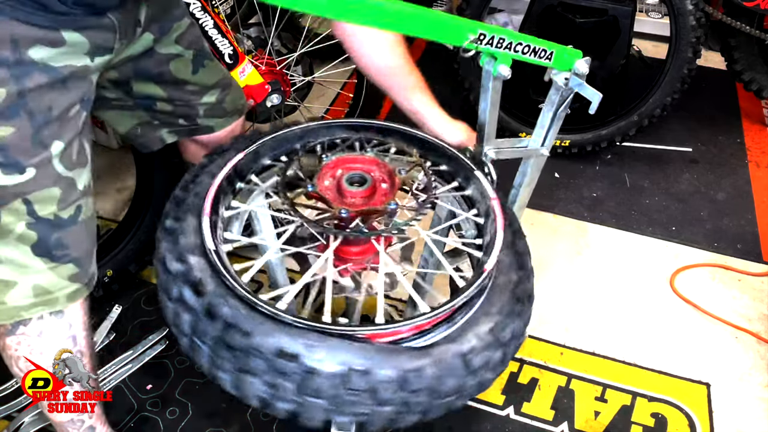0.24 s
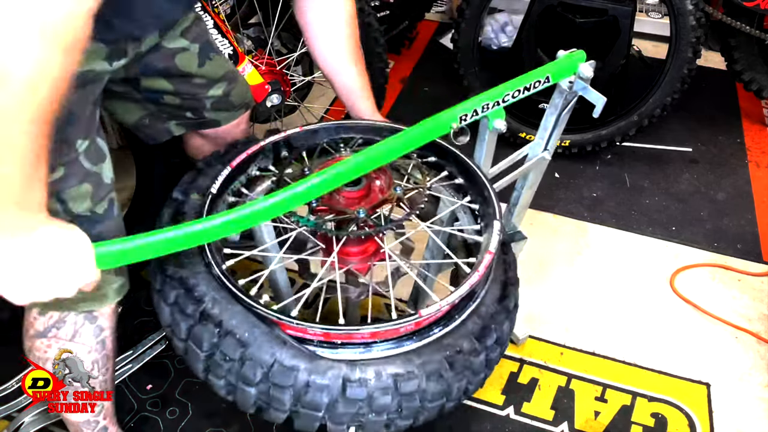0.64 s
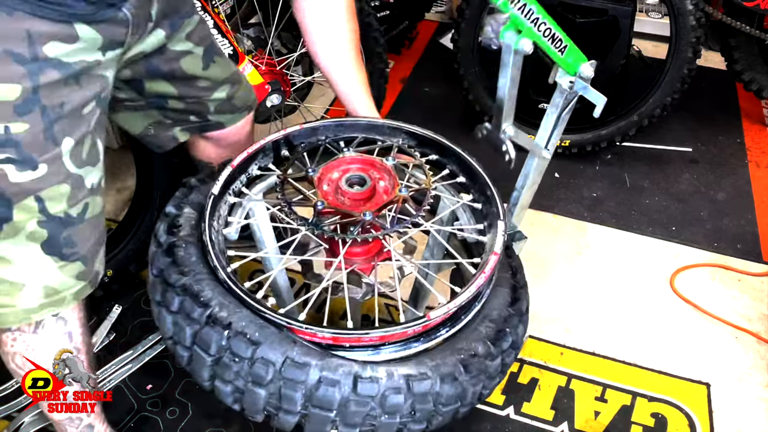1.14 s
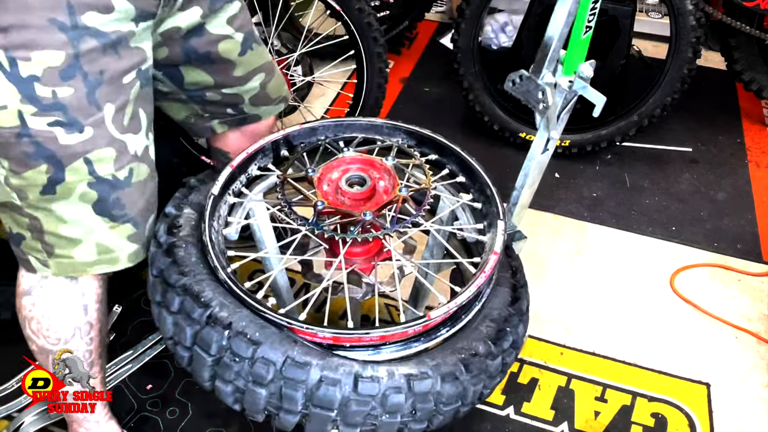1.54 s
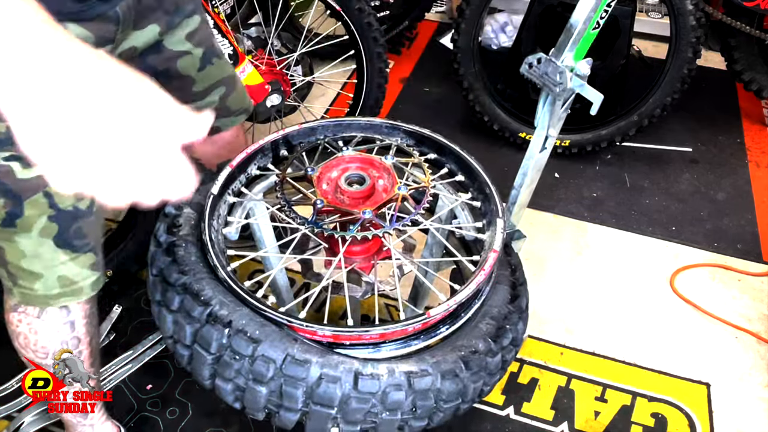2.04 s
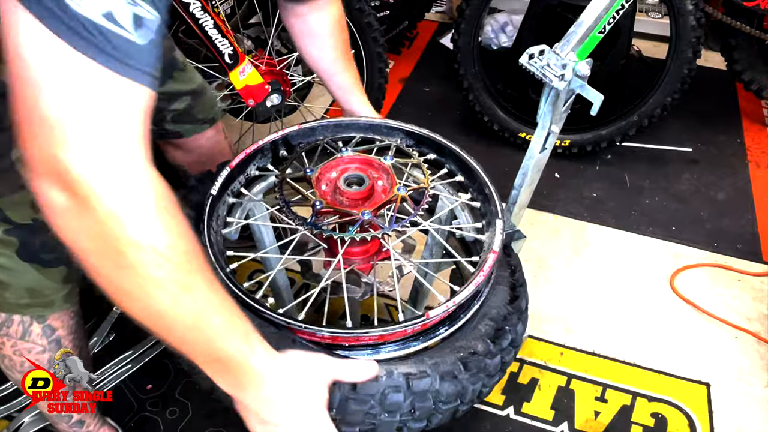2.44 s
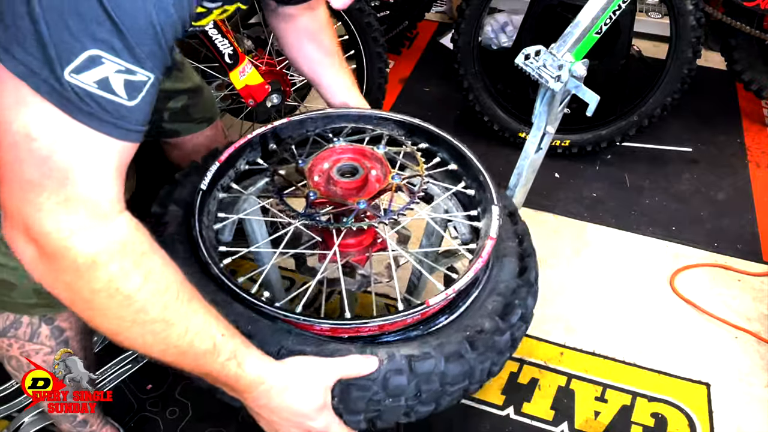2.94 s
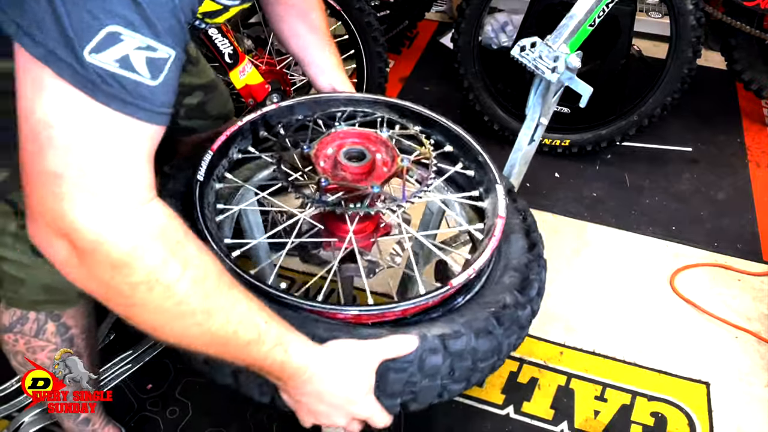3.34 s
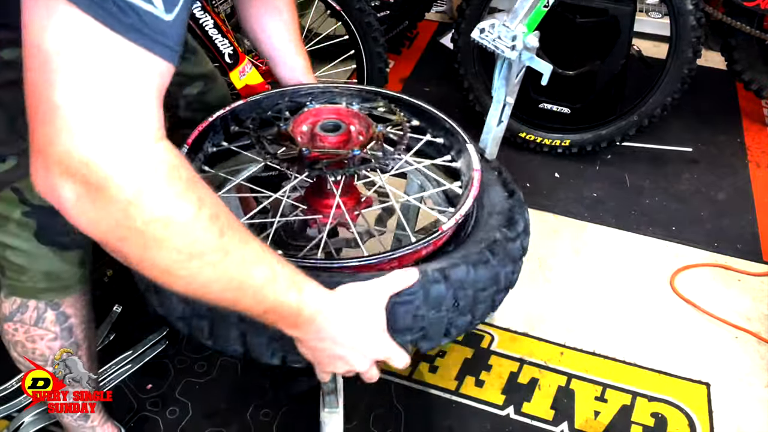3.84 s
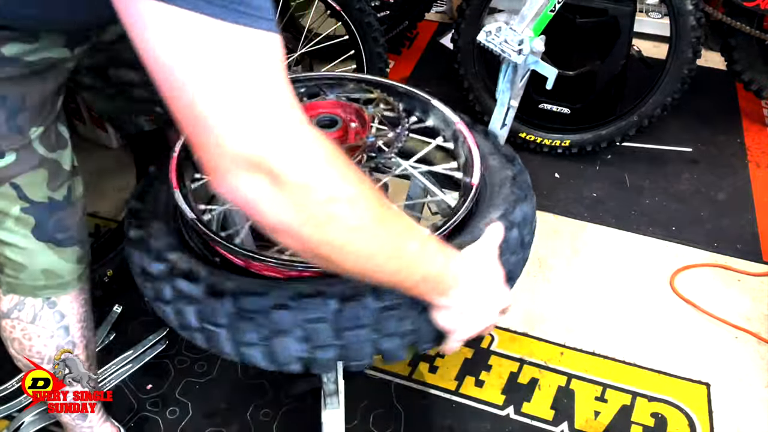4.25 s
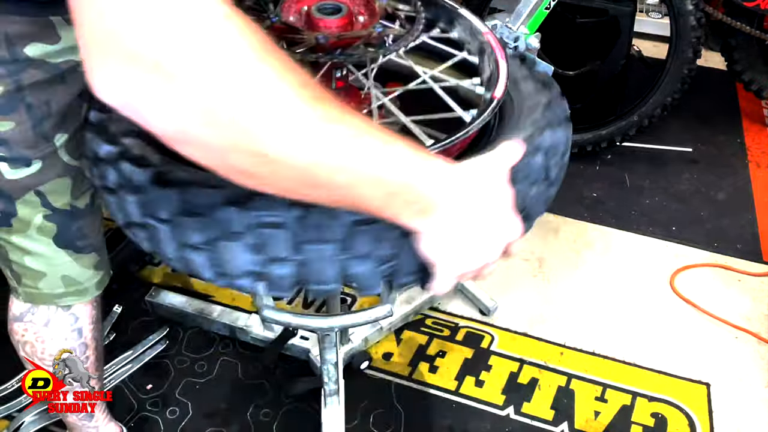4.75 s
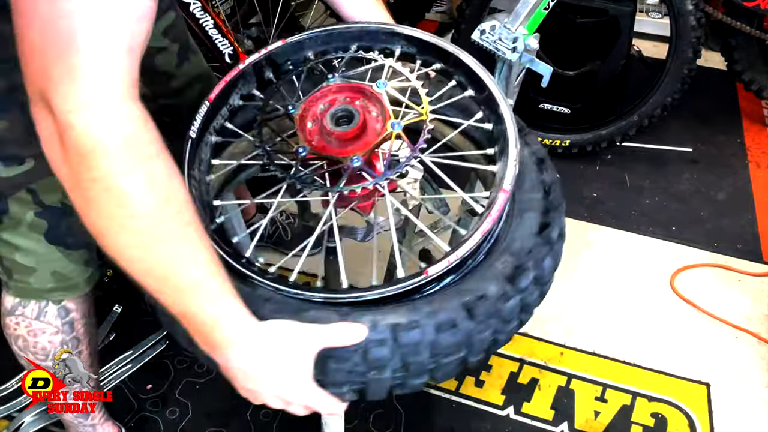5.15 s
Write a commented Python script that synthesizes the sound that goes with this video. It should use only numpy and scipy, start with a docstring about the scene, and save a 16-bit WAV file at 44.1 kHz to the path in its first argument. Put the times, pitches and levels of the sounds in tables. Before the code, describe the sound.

Close stereo pickup in a hard-walled garage: a lever and linkage clack in quick ringing blows over rubber thumps, pops and coarse scraping. The work fades to small taps while a faint low hum swells and goes. Soft touches follow, then the tire is tugged on its stand with harder knocks, rattles and ticks, the loudest clank near the end.

```python
"""A knobby tire is levered and pulled off a spoked wheel on a steel stand in a garage, in about 5.4 s.
First the lever and its linkage clack in quick blows, ringing lever modes, over rubber thumps, pops and scrapes.
A low sine hum swells to its peak near 1.5 s and is gone by 2.1 s, while the scrape all but stops.
Then blows ring the wheel: light taps, harder knocks on the stand from 3.5 s, the hardest near 5.1 s.
Rattles and bright ticks dot the work; noise tails are the hard walls' answer; a close pair of microphones hears it."""
import sys
import numpy as np
from scipy import signal
from scipy.fft import rfft, irfft, next_fast_len
from scipy.io import wavfile

SR = 44100
rng = np.random.default_rng(int(sys.argv[2]) if len(sys.argv) > 2 else 0)


def persist_wave(psi):
    """Save psi, clipped to +-1, as 16-bit WAV."""
    counts = np.round(np.clip(psi, -1, 1) * 32767).astype(np.int16)
    wavfile.write(sys.argv[1], SR, np.atleast_2d(counts).T)


N = 238316
PAD = next_fast_len(N + SR)   # room for a one-second tail
HZ = np.maximum(np.fft.rfftfreq(PAD, 1 / SR), 1)


def from_db(db):
    """Decibels to amplitude."""
    return 10 ** (np.asarray(db) / 20)


def rms_one(x):
    """Scale to an rms of one."""
    return x / np.sqrt(np.mean(x ** 2) + 1e-20)


def peak_one(x):
    """Scale to a peak of one, channels together."""
    return x / np.max(np.abs(x))


def at_hz(points, hz=HZ):
    """Read a curve of (frequency, value) points, straight over log frequency."""
    point_hz, value = np.transpose(points)
    return np.interp(np.log(hz), np.log(point_hz), value)


def shaped(x, response):
    """Filter by a frequency response."""
    return irfft(rfft(x, PAD) * response, PAD)[..., :N]


def band(x, low_hz, high_hz):
    """Keep one band, with gentle slopes."""
    return signal.sosfilt(signal.butter(2, [low_hz, high_hz], "band", fs=SR, output="sos"), x)


def ring(x, hz, t60_s):
    """A damped resonator: a unit click sets a sine of height about one ringing."""
    radius = from_db(-60 / (t60_s * SR))
    angle = 2 * np.pi * hz / SR
    feedback = [1, -2 * radius * np.cos(angle), radius * radius]
    return signal.lfilter([0, np.sin(angle)], feedback, x + 1e-18)


def chatter(contact_ms, bite_ms=1.0, size=4096):
    """Contact noise that bites quickly, rattles for its length and lets go."""
    t_ms = np.arange(size) / SR * 1000
    bite = (1 - np.exp(-t_ms / bite_ms)) ** 2
    let_go = np.exp(-(t_ms / contact_ms) ** 0.64)
    return rng.standard_normal(size) * bite * let_go


def add(out, start_s, sound):
    """Mix a sound in at its start, cut at the end of the scene."""
    i = round(start_s * SR)
    out[..., i:i + sound.shape[-1]] += sound[..., :out.shape[-1] - i]


# decay of the garage's reflections: centre_hz, t60_s
GARAGE_DECAY = [(100, 0.68), (260, 0.16), (700, 0.69), (1840, 0.53), (4850, 0.61), (9000, 0.3),
                (13000, 0.17)]
GARAGE_DB = -4.5


def garage(x):
    """Dense reflections: noise dying band by band, different in each channel, building up after the first wall."""
    t = np.arange(SR) / SR
    edges_hz = np.geomspace(40, 18000, 14)
    white = rng.standard_normal((2, 2, SR))   # neighbouring bands take turns with two noises
    tail = np.zeros((2, SR))
    for k, (low, high) in enumerate(zip(edges_hz, edges_hz[1:])):
        t60_s = at_hz(GARAGE_DECAY, np.sqrt(low * high))
        tail += band(white[k % 2], low, high) * from_db(-60 * t / t60_s)
    tail *= np.clip((t - 0.004) / 0.0041, 0, 1)
    tail /= np.sqrt(np.sum(tail ** 2) / 2)
    return shaped(x, rfft(tail, PAD))


# colour of the stand and floor shake: freq_hz, density_db (per Hz, relative)
SHAKE_SPECTRUM = [(13, -39.5), (22, -13.5), (81, 7), (136, -12.5), (205, -2), (278, -13.5), (400, -26),
                  (520, -69.5), (880, -120)]
SHAKE_DB, SHAKE_FOLLOWS = -33.5, 0.43   # base level; dB of shake per dB of effort


def stand_shake():
    """Lumpy low noise from the stand and floor, following part of the effort's swing."""
    noise = shaped(rng.standard_normal(N), from_db(at_hz(SHAKE_SPECTRUM)))
    return from_db(SHAKE_DB + SHAKE_FOLLOWS * effort_db()) * rms_one(noise)


HUM_PEAK_S, HUM_END_S = 1.53, 2.1
HUM_DB, HUM_RISE_DB_PER_S, HUM_FALL_DB_PER_S = -46.5, 26.5, 28.5   # rms level at the peak, and slopes
HUM_HZ, HUM_SAG_HZ_PER_S = 56.3, 3   # pitch at the peak, and its fall


def hum():
    """A low sine that swells and fades while its pitch sags a little."""
    t = np.arange(N) / SR - HUM_PEAK_S
    level_db = HUM_DB + np.minimum(HUM_RISE_DB_PER_S * t, -HUM_FALL_DB_PER_S * t)
    fade = np.clip((HUM_END_S - HUM_PEAK_S - t) / 0.088, 0, 1)
    hz = HUM_HZ - HUM_SAG_HZ_PER_S * t
    return np.sqrt(2) * fade * from_db(level_db) * np.sin(2 * np.pi * np.cumsum(hz) / SR)


# effort on the tire, as the drive of rubber dragged on rim and stand: time_s, level_db
EFFORT = [(0.0, -35.5), (0.15, -33), (0.3, -49.5), (0.43, -41), (0.62, -28.5), (0.86, -35), (1.05, -44.5),
          (1.35, -52.5), (1.64, -54), (1.86, -81.5), (2.2, -83.5), (2.28, -53), (2.45, -53), (2.58, -56),
          (2.7, -51.5), (2.85, -55.5), (2.99, -60.5), (3.1, -57), (3.34, -44), (3.76, -38), (3.94, -45.5),
          (4.18, -49), (4.3, -45), (4.66, -38.5), (4.83, -65), (5.11, -43.5), (5.26, -32.5), (5.4, -59)]


def effort_db():
    """The effort drawn straight from point to point."""
    time_s, level_db = np.transpose(EFFORT)
    return np.interp(np.arange(N) / SR, time_s, level_db)


# colour of dragged rubber: freq_hz, density_db (per Hz, relative)
RUBBER_SPECTRUM = [(100, -31.5), (160, 1.5), (500, 0.5), (1000, 2), (2200, -3.5), (3500, -9), (6000, -16),
                   (9000, -21), (12000, -28.5), (16000, -36.5)]
SLIPS_PER_S = 1500   # nominal: the clumps thicken and thin it
TILT_DB = 0.47   # added per band, dull to bright


def scrape():
    """Stick-slip: random slips of uneven size, in clumps, through the colour of the rubber."""
    clumps = from_db(6 * rms_one(band(rng.standard_normal(N), 7, 40)))
    sizes = from_db(1.4 * np.minimum(rng.exponential(1, (2, N)), 5)) * rng.choice([-1, 1], (2, N))
    happens = rng.random((2, N)) < SLIPS_PER_S * clumps / SR
    slips = sizes * happens / np.sqrt(SLIPS_PER_S / SR)
    hiss = 0.27 * rng.standard_normal((2, N))
    rubbed = rms_one(shaped(slips + hiss, from_db(at_hz(RUBBER_SPECTRUM))))
    edges_hz = [100, 600, 1500, 3500, 7500, 17000]
    tilted = np.zeros((2, N))
    for k, (low, high) in enumerate(zip(edges_hz, edges_hz[1:])):
        tilted += from_db(TILT_DB * k) * band(rubbed, low, high)
    return from_db(effort_db()) * tilted


# dull thumps of rubber and feet: start_s, level_db, nominal_hz, t60_ms (10 at least)
THUMP_EVENTS = [(0.022, -42.5, 410, 34), (0.139, -41.5, 303, 33), (0.27, -42, 339, 100),
                (0.324, -40.5, 346, 26), (0.467, -29, 356, 67), (0.488, -31.5, 622, 37),
                (0.594, -35, 388, 34), (0.625, -25.5, 302.4, 22), (0.703, -37, 347, 25),
                (1.025, -43, 206, 75), (1.582, -42, 66, 31), (1.701, -62.5, 394, 61),
                (1.862, -41.5, 197.6, 68), (2.287, -54.5, 516, 13), (2.303, -52, 195, 42),
                (2.39, -54.5, 200, 69), (2.627, -45, 130, 72), (2.767, -38.5, 108.5, 65),
                (3.114, -46, 208, 81), (3.392, -38, 82, 56), (3.521, -43, 457, 48), (3.617, -40.5, 228, 26),
                (3.714, -23, 112.7, 47), (4.136, -43, 256, 150), (4.592, -33.5, 253, 21),
                (4.746, -39, 233, 22), (5.064, -23.5, 298, 8.4), (5.083, -40, 111, 63),
                (5.211, -40, 212, 20)]
BOOM_DB = -5.5


def thumps():
    """A soft push into one low damped mode, sagging in pitch as the rubber relaxes, and a boom from the floor."""
    out, t = np.zeros(N), np.arange(8192) / SR
    for start_s, level_db, nominal_hz, t60_ms in THUMP_EVENTS:
        push = chatter(13.0, 1.1, size=8192)
        sagging_hz = nominal_hz * (0.89 + 0.34 * np.exp(-t / 0.013))
        phase = 2 * np.pi * (np.cumsum(sagging_hz) / SR + rng.random())
        swell = (1 - np.exp(-t / 0.0082)) ** 4
        decay = from_db(-60000 * t / max(t60_ms, 10))
        note = peak_one(np.sin(phase) * swell * decay)
        slap = 1.2 * peak_one(band(push, nominal_hz / 6.6, nominal_hz * 3.1))
        boom = from_db(BOOM_DB) * peak_one(band(push, 63, 160))
        add(out, start_s, from_db(level_db) * (note + slap + boom))
    return out


# short round pops of rubber letting go: peak_s, level_db, pitch_hz (at the peak), width_ms (peak to 1/e)
POP_EVENTS = [(0.035, -27.5, 420, 3.1), (0.479, -29, 384, 1.5), (0.604, -21, 393, 3.1),
              (0.636, -23, 390, 2.8), (0.715, -23.5, 370, 3.1), (0.76, -33, 617, 4.9),
              (2.616, -40, 371, 1.8), (2.74, -37, 400, 1), (2.763, -38.5, 410, 2.7), (3.127, -41, 230, 4.4),
              (3.629, -38, 302, 2.6), (4.341, -35.5, 370, 2.6), (4.757, -43, 261, 4.1)]


def pops():
    """A brief tone under a bell-shaped swell, sliding down in pitch."""
    out, t = np.zeros(N), np.arange(-512, 1024) / SR
    for peak_s, level_db, pitch_hz, width_ms in POP_EVENTS:
        swell = np.exp(-(1000 * t / width_ms) ** 2)
        cycles = pitch_hz * t * (1 - 15 * t) + rng.random()
        add(out, peak_s + t[0], from_db(level_db) * swell * np.cos(2 * np.pi * cycles))
    return out


# thin bright ticks: start_s, level_db, contact_ms
TICK_EVENTS = [(0.2455, -30.5, 4), (0.474, -29, 14), (0.8286, -34.5, 7.9), (1.3608, -25.5, 1.5),
               (1.72, -41.5, 8.9), (2.38, -42.5, 6.8), (2.828, -41, 10.5), (3.212, -48, 16),
               (3.644, -26.5, 5.1), (3.8625, -23, 14), (3.898, -23, 13), (4.4629, -24, 10)]
TICK_HZ = 7080


def ticks():
    """Small hard touches: treble contact noise and a faint high resonance."""
    out = np.zeros(N)
    for start_s, level_db, contact_ms in TICK_EVENTS:
        contact = chatter(contact_ms)
        touch = peak_one(band(contact, 5700, 16000))
        ping = 0.2 * peak_one(ring(contact, TICK_HZ, 0.042))
        add(out, start_s, from_db(level_db) * (touch + ping))
    return out


# the wheel or lever shudders in a run of fast contacts: start_s, level_db, rise_ms, fall_ms, tone_hz
RATTLE_EVENTS = [(.508, -26, 3.8, 16, 1775), (3.709, -18, 110, 19.5, 2080), (4.385, -42.5, 58, 32, 1820),
                 (0.859, -37.5, 10.4, 11, 1430), (2.729, -53, 4.7, 125, 896), (3.259, -56, 9.5, 24, 1210),
                 (3.598, -39.5, 9.6, 9.4, 876), (4.572, -36, 9.1, 36, 2320), (5.08, -25.5, 3.9, 56, 1020)]


def rattles():
    """Uneven clicks, about 4000 a second, swell and die through a broad band with some treble."""
    out, t_ms = np.zeros((2, N)), np.arange(SR // 2) / SR * 1000
    shape = (2, len(t_ms))
    for start_s, level_db, rise_ms, fall_ms, tone_hz in RATTLE_EVENTS:
        clicks = (rng.random(shape) < 4000 / SR) * rng.laplace(size=shape)
        body = rms_one(band(clicks, tone_hz / 5.5, tone_hz * 2.1))
        sparkle = 0.27 * rms_one(band(clicks, 7300, 13000))
        swell = peak_one((1 - np.exp(-t_ms / rise_ms)) ** 2 * np.exp(-t_ms / fall_ms))
        add(out, start_s, from_db(level_db) * swell * (body + sparkle))
    return out


# modes of the lever and its linkage: freq_hz, level_db, t60_s (of the free ring)
LEVER_MODES = [(557.3, 6.5, 0.94), (954, -7, 0.27), (968, -1.5, 0.4), (1026, -6.5, 0.71),
               (1360, -13.5, 0.14), (1367, 6.5, 0.12), (1538, -4, 0.16), (1610, -4, 0.11),
               (1954, 1.5, 0.21), (2070, 0, 0.23), (2252, 2.5, 0.23), (2790, -13, 0.18), (2670, -15, 0.24),
               (3010, -4, 0.27), (3040, -2.5, 0.42), (3700, -12.5, 0.14), (3630, -5.5, .14),
               (3785, -2, 0.2), (3770, -21.5, 0.19), (4340, -0.5, 0.19), (4800, -19.5, .3),
               (5930, 0.5, 0.25), (6500, -8.5, 0.17), (12300, 3, 0.072)]
# modes of the spoked wheel: freq_hz, level_db, t60_s (of the free ring)
WHEEL_MODES = [(740, -3, 0.29), (890, -8.5, 0.13), (998, 0, 0.17), (1101, -1, 0.14), (1413, 0, 0.22),
               (1455, 4.5, 0.29), (1561, -2, 0.16), (1570, 2, 0.17), (1663, 3, 0.31), (1860, -1.5, 0.35),
               (2085, 2, 0.3), (2261, 5.5, 0.2), (2543, 4, 0.16), (2674, 2, .2), (2737, -8, 0.15),
               (3050, -8, 0.32), (3230, -10.5, 0.4), (3460, -7, .26), (3990, -9, 0.35), (4624, -6, .2),
               (5100, -1, 0.36), (5300, -12, .24), (6035, -17, .27), (6700, 8.5, 0.14), (10570, -6.5, 0.35),
               (10770, -2, 0.15)]
LEVER_LET_GO_S = 2.15   # blows ring the lever before this, the wheel after
NEAR_DB_PER_OCTAVE = 17   # modes away from the struck notes ring less
TWIN_SHARE, TWIN_APART = 0.82, 0.0041   # weaker twin of each mode; its typical offset as a share of pitch
FLUTTER_DB, FLUTTER_STEPS = 6, 64   # spread of the flutter; steps over the half second of a ring
MOST_MODES = 40   # random values are drawn for this many modes, whichever part is struck


def mode_rings(modes, first_hz, second_hz, second_note_db, top_db, bite_ms, free_share):
    """Damped modes near the struck notes, beating with twins; loose parts touching make each flutter on its own."""
    t = np.arange(SR // 2) / SR
    hz, level_db, t60_s = np.transpose(modes)[:, :, None]
    near_first_db = -NEAR_DB_PER_OCTAVE * np.abs(np.log2(hz / first_hz))
    near_second_db = second_note_db - NEAR_DB_PER_OCTAVE * np.abs(np.log2(hz / second_hz))
    near_top_db = top_db - 6.0 - 30 * np.abs(np.log2(hz / 10600))
    near_db = np.maximum(np.maximum(near_first_db, near_second_db), near_top_db)
    luck = rng.standard_normal((MOST_MODES, 3))[:len(hz)]   # twin's offset, then a phase for each channel
    pair = 1 + TWIN_SHARE * np.exp(2j * np.pi * TWIN_APART * luck[:, :1] * hz * t)
    # overlapping triangles join the random flutter values with straight lines
    knots = np.arange(FLUTTER_STEPS + 1)[:, None]
    triangles = np.maximum(1 - np.abs(2 * FLUTTER_STEPS * t - knots), 0)
    flutter = rng.standard_normal((MOST_MODES, FLUTTER_STEPS + 1))[:len(hz)]
    flutter_db = FLUTTER_DB * flutter @ triangles
    decay_db = -60 * t / (t60_s * free_share)
    waves = from_db(level_db + near_db + flutter_db + decay_db) * pair * np.exp(2j * np.pi * hz * t)
    stereo = np.imag(np.exp(2j * luck[:, 1:]).T @ waves)
    return stereo * (1 - np.exp(-1000 * t / bite_ms))


# blows on metal, each with two notes of the struck part in either order:
# start_s, level_db, first_hz, first_note_db, second_hz, second_note_db,
# treble_db, dull_db, bite_ms, contact_ms, ring_db, free_share (ring length as a share of the free ring)
BLOWS = [(0.055, -30.5, 1960, 3, 3230, 4, -19, -2.5, 0.49, 3.8, -17, 0.8),
         (0.111, -30, 1920, 10, 3530, 3, -9, -4, 0.49, 2, -15, 0.62),
         (0.1426, -9, 1930, 0.5, 1312, -1.5, -22, -18.5, 1.1, 2.7, -20, 0.45),
         (0.32, -28.5, 1650, -2, 4100, -5, -19, -7, 0.81, 1.6, -21, 0.55),
         (0.442, -10, 1294, -4.5, 4530, -8, -10, -27, 2.9, 8.5, -17, 0.65),
         (0.494, -15, 1530, -4, 5200, -7, -4, -21, 0.71, 13, -17, 0.64),
         (0.57, -30.5, 2040, -10, 3250, 7.5, 4.5, 1, 0.48, 2.9, -14, 1.1),
         (0.621, -7.5, 1360, 2.5, 3890, 1.5, 4, -19, 0.91, 3.7, -22.5, 0.76),
         (0.626, -18.5, 2730, 9, 4790, 2, 9, -31, 1.9, 5.7, -13.5, .6),
         (0.65, -31, 2500, 2, 3980, -4, 2, -20, .8, 4.5, -29, .8),
         (0.894, -20, 1430, 1.5, 2270, -1, -36, -8, 0.6, 6.1, -13, 0.52),
         (0.91, -29.5, 1980, 4, 1150, 0, -28, -2.5, 1.1, 5, -19, 0.71),
         (0.943, -28, 1380, 3, 2290, -2.5, -29, -4, 1, 5, -19, 0.84),
         (1.003, -25, 1660, -3, 3680, -5.5, -14, -13, 0.8, 3.9, -37, 0.66),
         (1.022, -20, 950, -1, 1710, -4.5, -23, -17, 0.48, 3.5, -15, 0.51),
         (1.085, -34.5, 3030, 7, 4250, 1, 1, -20, .8, 3.5, -16, 1.2),
         (1.091, -28, 1010, -3, 1400, -0.5, -1.5, -22, 0.79, 8, -26, 1.1),
         (1.186, -21.5, 1450, -2, 4260, 0.5, -5, -13.5, 0.47, 2.7, -18, 0.61),
         (1.189, -25.5, 960, -6, 3000, 1, -1, -7, .7, 3.2, -16.5, 0.59),
         (1.361, -36, 2160, 1, 990, -5, 2.5, -12, 2.6, 13, -13, 1.1),
         (1.49, -58.5, 1430, -7, 920, 6.5, -37, -4, 2.6, 4.2, -3.5, 1.7),
         (1.601, -44.5, 1410, -5, 3140, 2.5, -5.5, -8.5, .9, 19, -12.5, 1),
         (1.799, -32.5, 1340, 0.5, 3390, 3, 1.5, -17, 1.3, 11.5, -11.5, 0.79),
         (1.857, -22, 870, -4, 1950, -6, -12.5, -19, 0.61, 18, -11.5, 0.24),
         (2.211, -52, 2110, 8.5, 3670, -23.5, -17, -8.5, 0.93, 6.7, -16, 0.96),
         (2.237, -36.5, 1340, 1, 2590, -1, -26.5, -30, 0.93, 11, -26, .7),
         (2.305, -35.5, 2140, -1, 2590, -3, -18, -3.5, 0.57, 4.7, -28, 0.58),
         (2.394, -47, 1030, 8, 1600, -3, -9, -5, 0.91, 8.2, -16, 1.1),
         (2.424, -33, 980, -4.5, 2200, -9.5, -11, -14.5, 0.78, 17, -24, 0.79),
         (2.497, -33.5, 2300, -13, 1040, -4.5, -10.5, -9.5, 1.1, 11, -23.5, 0.8),
         (2.612, -43.5, 700, -14, 2980, -27, -2.5, -5, 0.59, 15, -18, 1.1),
         (2.741, -47, 1490, 0, 2550, -4, -17, -1, 1.2, 12, -12, 1.1),
         (2.824, -45.5, 1530, 1, 5070, -19, 1, -22, 0.64, 2.2, -12.5, 0.68),
         (2.875, -48, 970, 3, 2500, -2.5, -20, -19, .8, 4.3, -16, .9),
         (2.935, -52, 2280, 10.5, 2700, 1, -27, -13, 0.73, 4.9, -18, .9),
         (3.027, -41, 1950, -22.5, 2880, -33, -11.5, -8, 1.1, 35, -23, 0.96),
         (3.13, -46.5, 1460, 6, 3300, -26, -8, -7, 0.95, 7, -14.5, 0.92),
         (3.27, -40, 1570, -4, 2300, -8, -23, -3, 0.66, 6.2, -34, .9),
         (3.282, -38.5, 1560, 2, 2820, -7, -27, 0, 0.66, 6.4, -30, .9),
         (3.354, -24.5, 2400, -22, 3850, -0.5, -6, -14, 1, 20, -21.5, 1.1),
         (3.519, -14.5, 1070, -11, 3180, -14, -6.5, -19, 0.15, 13, -25.5, 1.7),
         (3.705, -17, 1120, -2, 2480, -16, -10, -16, 0.35, 1.5, -20, 0.86),
         (3.71, -7.5, 966, -9.5, 2140, -19, -9.5, -24, 1.14, 66, -14, 0.52),
         (4.128, -14, 1600, 3, 4120, -4, 8, -35, 5, 1.94, -12, 1.03),
         (4.133, -4.5, 1520, 3.5, 2510, -10, -15, -34, 1.5, 2.74, -28, 1),
         (4.16, -15, 1760, -3, 3040, 1.5, -25, -25, 1.7, 4.6, -18, 0.86),
         (4.453, -30.5, 1920, 1.5, 3240, -0.5, 1.5, -17, 1.4, 6, -15.5, .8),
         (4.571, -25, 1198, -1, 2840, -5, -0.5, -16, 1.4, 36, -18.5, 0.67),
         (4.605, -24.5, 2430, 2, 3180, -2, 1, -21, 1.3, 10.5, -17, 0.95),
         (4.773, -39, 2352, -4, 4520, -35, 9.5, -24, 0.68, 6.8, -29, .9),
         (4.806, -43.5, 2660, -18, 3030, -10, 11, -8, 0.5, 9.4, -25, .9),
         (5.066, 3.5, 995, -8, 1836, -6.5, -21.5, -20.5, 2.04, 2.14, -20, 0.32),
         (5.072, -3, 1230, -6, 2300, -15, -5.5, -18, 1.1, 6.8, -19, 0.44),
         (5.29, -11, 2287, 0, 1440, -6, -14.5, -27, 1.3, 10, -18.5, 1.1),
         (5.297, -17, 1940, -1.5, 3270, 2.5, -16, -35, 0.77, 4.1, -11, 0.82)]
MIDDLE_DB = -5.5   # the two notes, the middle of the crack and the rings
TOP_DB = -1.5   # upper treble band against the treble of a blow
CRACK_SHARE = 0.99   # middle crack against the notes
NOTE_T60_S = 0.016   # the two short notes of a blow


def knocks():
    """Each blow is a crack in four bands, two short notes of the struck part, and modes near those notes."""
    out = np.zeros((2, N))
    for (start_s, level_db, first_hz, first_note_db, second_hz, second_note_db,
         treble_db, dull_db, bite_ms, contact_ms, ring_db, free_share) in BLOWS:
        top_db = treble_db + TOP_DB
        contact = np.array([chatter(contact_ms, bite_ms), chatter(contact_ms, bite_ms)])
        # the microphone ports face different sides of the part
        contact[1] = 0.051 * contact[0] + 0.65 * contact[1]
        middle = CRACK_SHARE * peak_one(band(contact, max(0.58 * first_hz, 700), 3100))
        first_note = from_db(first_note_db) * peak_one(ring(contact, first_hz, NOTE_T60_S))
        second_note = from_db(second_note_db) * peak_one(ring(contact, second_hz, NOTE_T60_S))
        dull = from_db(dull_db) * peak_one(band(contact, 517, 748))
        treble = from_db(treble_db) * peak_one(band(contact, 2290, 6110))
        top = from_db(top_db) * peak_one(band(contact, 4610, 11230))
        crack = from_db(MIDDLE_DB) * (middle + first_note + second_note) + dull + treble + top
        modes = LEVER_MODES if start_s < LEVER_LET_GO_S else WHEEL_MODES
        rings = mode_rings(modes, first_hz, second_hz, second_note_db, top_db, bite_ms, free_share)
        add(out, start_s, from_db(level_db) * crack)
        add(out, start_s, from_db(level_db + MIDDLE_DB + ring_db) * rings)
    return out


def scene():
    """Metal, rubber, scrape and lows, with the walls answering all but the lows."""
    hard = knocks() + rattles() + ticks()
    soft = thumps() + pops()
    rubbed = scrape()
    heard_by_walls = hard.mean(axis=0) + soft + 0.043 * rubbed[0]
    lows = stand_shake() + hum()
    return hard + soft + rubbed + lows + from_db(GARAGE_DB) * garage(heard_by_walls)


# colour of the microphones: freq_hz, gain_db
MIC_COLOUR = [(30, -7.5), (100, -3), (5000, 4.5), (5550, -0.5), (6100, 6), (8000, 0), (10600, 4.5),
              (12500, -2), (14000, -9), (15700, -11.5), (16300, -16.5)]
# how alike the two channels are: freq_hz, likeness (0-1)
CHANNEL_LIKENESS = [(60, 0.93), (350, 0.71), (600, 0.3), (1500, 0.34), (5000, 0.14), (7000, 0.084),
                    (8200, 0.96), (10500, 1), (13200, 0.93)]
# turn of the right channel's phase: freq_hz, turn_radians
PHASE_TURN = [(6000, 5.5), (8800, 3.1), (10500, 2.08), (12000, 0.33), (12900, .05)]
CUTOFF_HZ = 16800


def record(dry):
    """The channels agree in the bass and, with turned phase, in the treble; colour, rounded peaks, top cut."""
    left, right = rfft(dry, PAD) * from_db(at_hz(MIC_COLOUR))
    alike = np.clip(at_hz(CHANNEL_LIKENESS), 0, 0.999)
    turn = at_hz(PHASE_TURN) * np.clip((HZ - 2000) / 4000, 0, 1)   # no turn below 2 kHz
    right = alike * np.exp(-1j * turn) * left + np.sqrt(1 - alike ** 2) * right
    right_db = at_hz([(300, -1.5), (4500, -2.0), (7500, -0.5)])   # freq_hz, gain_db
    pair = irfft(np.array([left, from_db(right_db) * right]), PAD)[:, :N]
    rounded = 0.96 * np.tanh(pair / 0.96)
    top_cut = signal.cheby2(12, 70, CUTOFF_HZ, fs=SR, output="sos")
    return signal.sosfilt(top_cut, rounded)


dry = scene()
out = record(dry)
persist_wave(out)
```